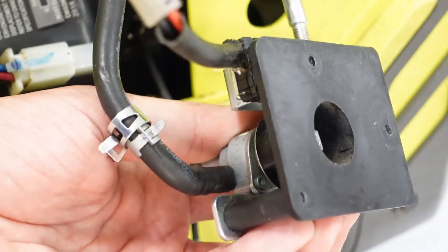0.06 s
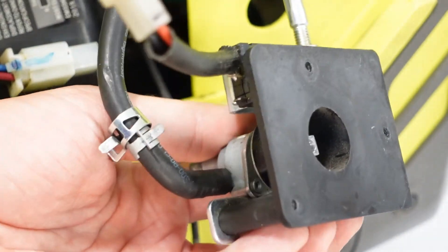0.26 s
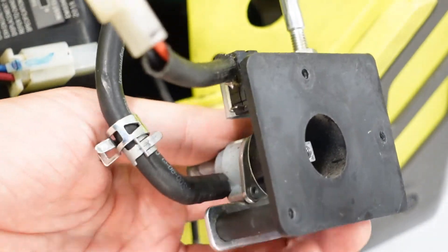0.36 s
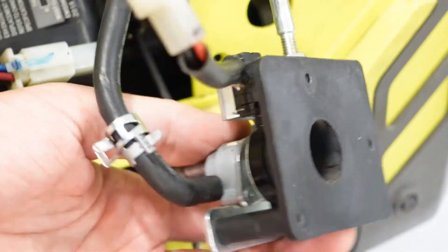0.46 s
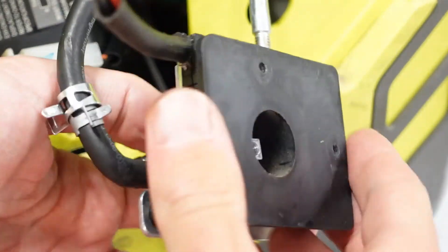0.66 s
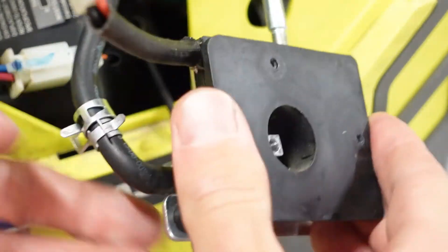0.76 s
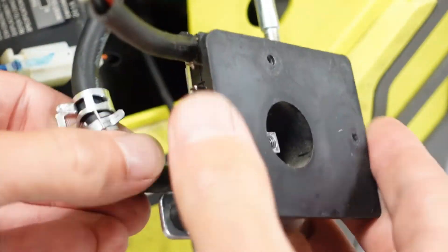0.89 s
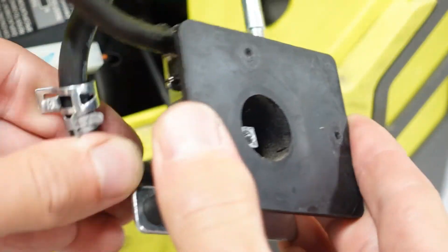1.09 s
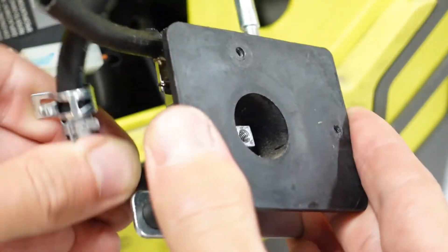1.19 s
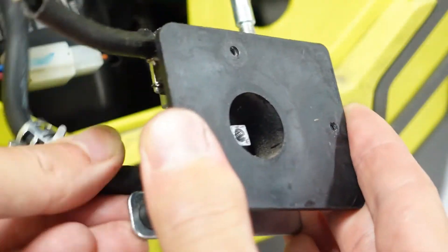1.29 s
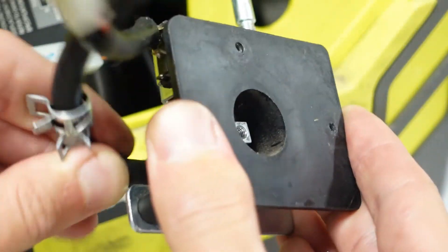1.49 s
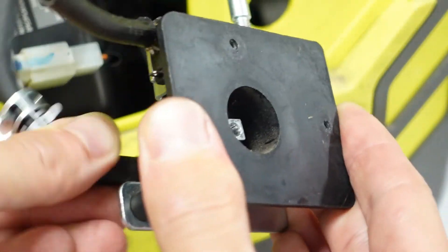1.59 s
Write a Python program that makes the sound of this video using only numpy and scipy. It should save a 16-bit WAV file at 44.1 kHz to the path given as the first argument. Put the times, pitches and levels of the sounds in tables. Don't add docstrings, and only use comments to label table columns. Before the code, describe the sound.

Pliers are put down on a hollow bench, close up. At about 0.2 seconds a soft, dull cluster of touches; at 0.33 a hard knock with rapid rebounds, a bright steel snap at 0.34, a short low boom and chattering rattle. Faint clicks follow near 0.55 and 0.85, then barely audible finger rubs and taps on plastic from 0.7 to 1.5, over quiet workshop hum.

```python
import sys
import numpy as np
from scipy import signal
from scipy.fft import rfft, irfft
from scipy.io import wavfile
from scipy.ndimage import uniform_filter1d

SR = 44100
rng = np.random.default_rng(int(sys.argv[2]) if len(sys.argv) > 2 else 0)


def convert_level_to_amplitude(level_db):
    exponent = np.asarray(level_db, float) / 20
    return 10 ** exponent


def generate_wav(sig):
    pcm = np.round(np.clip(np.atleast_2d(sig).T, -1, 1) * 32767).astype(np.int16)
    wavfile.write(sys.argv[1], SR, pcm)


N = 72765

# pitch in Hz, level in dB per Hz.
AIR_COLOUR = [(15, -38), (25, -6), (180, -3.5), (309, -10.5), (427, -9), (863, -14.5), (962, -14.5),
              (1160, -20), (16000, -27)]
# pitch in Hz, level in dB.
HUM_TONES = [(247.6, -84), (500.6, -79.5), (995.9, -86), (1254, -92.5), (2003, -95), (2498, -99.5),
             (2751, -95.5), (2998, -90)]
# start in seconds, level in dB, contact time in ms.
TOUCH_BLOWS = [
    (.2080, -24, 0.48),
    (.2123, -22.5, 0.33),
    (.2165, -18.5, 0.75),
    (.2212, -20, 3.05),
    (.2335, -34, 0.24),
    (.243, -41.5, 1.8),
    (.258, -40, 1.9),
    (.266, -39, 1.3),
]
# start in seconds, level in dB, contact time in ms.
KNOCK_BLOWS = [
    (.3256, -12.5, 0.12),
    (.3297, -16.5, 0.17),
    (.3327, -11.5, 0.27),
    (.3400, -16, 1.2),
    (.3455, -34, 0.63),
    (.354, -18.5, 1.12),
    (.362, -23, 1.5),
    (.371, -27, 1.32),
    (.380, -32.5, 1.34),
    (.389, -28, 1.78),
]
# pitch in Hz, level in dB, time to fall 60 dB in seconds.
TOUCH_TONES = [(143.3, -19, 0.062), (300, -13, 0.068), (360, 3, 0.071), (410, 7.5, 0.048),
               (560, 2.5, 0.076), (625, -3.5, 0.039), (980, -3, 0.02), (1150, -13.5, 0.017),
               (1707, -23.5, .03), (2020, -5, .06), (3200, -8.5, .04)]
# pitch in Hz, level in dB, time to fall 60 dB in seconds.
KNOCK_TONES = [(249, -23, 0.081), (300.3, -49, 0.0715), (394, -7, 0.024), (409, -2, 0.086),
               (495.7, -3, 0.028), (600, 2.5, 0.031), (695, 4.5, 0.021), (834, -11, 0.026),
               (1053, 1.5, 0.033), (1460, 1.5, 0.0068), (2238, -18, .01)]
# pitch in Hz, level in dB, time to fall 60 dB in seconds.
BOOM_TONES = [(136.7, -6.5, 0.53), (143, -7.5, .22), (161.5, 1, 0.19), (210, -12, .1), (92.3, -30.5, 0.18)]
# start in seconds, level in dB, rise in seconds, time to fall 60 dB in seconds, treble lift in dB.
CHATTER_BURSTS = [
    (0.21, -40.5, 0.0022, .5, -5),
    (0.3255, -38.5, 0.0017, 0.28, 3.5),
    (.341, -33, .003, 0.35, -5.5),
    (.532, -54, .003, .3, 0),
    (.565, -53.5, 0.0058, 0.27, 18),
    (0.795, -53.5, 0.0032, .15, 8),
    (0.961, -50, 0.0056, 0.054, 5),
]
# pitch in Hz, level in dB per Hz.
SCRAPE_COLOUR = [(1000, -14), (1700, -5.5), (2300, -10.5), (4700, -13), (10500, -11.5), (12500, -24),
                 (15500, -32.5)]
# pitch in Hz, time to fall 60 dB in seconds.
ROOM_DECAY = [(100, 0.2), (400, 0.33), (1500, 0.08), (5000, 0.58), (12000, 0.48)]
SNAP_TIMES = [
    .3257,
    .330,
    .3380,
    .33975,
    .34012,
    .34049,
    .534,
    .5762,
    .849,
]
SNAP_LEVELS = [-27.5, -31, -40, -8.5, -10.5, -20, -38, -41, -47]
SNAP_SHARES = [0.31, 0.15, 0.5, 0.93, 0.99, 1, .5, .15, .6]
# pitch in Hz, level in dB, time to fall 60 dB in seconds.
JAW_TONES = [(2970, -13, 0.0065), (5585, -6.5, 0.003), (7910, -11.5, 0.0017), (10550, -2.5, 0.0042),
             (11380, -5, .004), (15200, -27, .003)]
# start in seconds, length in seconds, level in dB, pitch in Hz, width in Hz.
FINGER_RUBS = [(0.718, 0.018, -64, 196, 100), (.858, 0.0068, -66.5, 451, 147.8),
               (.967, 0.0092, -59, 893, 329), (.970, 0.008, -61.5, 512, 251.5),
               (1.125, 0.0099, -69, 514, 97.7), (1.263, 0.041, -63.5, 495.5, 81.7),
               (1.427, 0.0097, -57, 866, 148), (1.433, 0.011, -54.5, 920, 146),
               (1.443, 0.021, -59, 907, 149), (1.425, 0.054, -62.5, 311, 60),
               (1.427, 0.12, -72.5, 1287, 70.8), (1.465, 0.036, -63.5, 600, 196)]
# top of the band in Hz, level that opens it fully in dB.
GATE_BANDS = [(400, -44), (1600, -44), (4000, -53), (9000, -54.5), (20000, -50)]

GATE_DEPTH_DB = 15


def evened(x):
    return x / np.sqrt(np.mean(x ** 2) + 1e-20)


def read(points, hz):
    f, value = np.transpose(points)
    return np.interp(np.log(hz + 1), np.log(f + 1), value)


def add(mix, s, sound):
    part = mix[round(s * SR):][:len(sound)]
    part += sound[:len(part)]


def resonate(x, hz, width):
    turn = np.exp(2j * np.pi * hz * np.arange(len(x)) / SR)
    r = np.exp(-np.pi * width / SR)
    return 2 * (turn * signal.lfilter([1 - r], [1, -r], x / turn)).real


def ring(tones, build_cycles):
    t = np.arange(SR // 2) / SR
    total = np.zeros(len(t))
    for hz, db, t60 in tones:
        decay = convert_level_to_amplitude(db - 60 * t / max(t60, .001))
        build = 1 - np.exp(-t * hz / (build_cycles * (hz < 450) + 0.019))
        total += decay * np.sin(2 * np.pi * hz * t) * build
    return total


def workshop():
    air_db, hum_width_hz = -67, 17
    frames, hz = N // 256 + 5, np.fft.rfftfreq(1024, 1 / SR)
    a, b, patches = rng.standard_normal((frames, 513, 3)).T
    patches = evened(uniform_filter1d(uniform_filter1d(patches, 8, 0), 6, 1))
    patch_db = read([(200, 1.5), (1200, 4.4), (3000, .6)], hz)[:, None]
    level = convert_level_to_amplitude(read(AIR_COLOUR, hz)[:, None] + patch_db * patches)
    air = signal.istft((a + 1j * b) * level, nperseg=1024, noverlap=768)[1][:N]
    noise = rng.standard_normal(N)
    hum = np.zeros(N)
    for f, db in HUM_TONES:
        tone = resonate(resonate(noise, f, hum_width_hz), f, hum_width_hz)
        hum += convert_level_to_amplitude(db) * evened(tone)
    return convert_level_to_amplitude(air_db) * evened(air) + hum


def bench(blows, tones):
    force = np.zeros(N)
    for s, db, ms in blows:
        u = np.arange(200) / SR * 1000 / max(ms, .05)
        push = np.sin(np.pi * np.minimum(u, 1)) ** 2
        add(force, s, convert_level_to_amplitude(db) * push / push.sum())
    return signal.fftconvolve(force, 0.35 * ring(tones, build_cycles=2.2))[:N]


def room(x):
    room_db, treble_db, gap_s = -8, -8.5, 0.002
    taps = np.zeros(SR // 2)
    at = np.arange(0, len(taps) - 12, 12)
    taps[at + rng.integers(0, 12, len(at))] = rng.choice([-1., 1.], len(at))
    hz, t, z = signal.stft(taps, SR, nperseg=256)
    tilt_db = treble_db * np.clip(np.log2(hz / 1000 + 1e-3) / 3, 0, 1)
    fade_db = tilt_db[:, None] - 60 * t / read(ROOM_DECAY, hz)[:, None]
    tail = signal.istft(z * convert_level_to_amplitude(fade_db), SR, nperseg=256)[1]
    tail = np.r_[np.zeros(round(gap_s * SR)), tail / np.linalg.norm(tail)]
    return convert_level_to_amplitude(room_db) * signal.fftconvolve(x, tail)[:N]


def chatter():
    grain_db = 1.5
    out, t, hz = np.zeros(N), np.arange(12000) / SR, np.fft.rfftfreq(12000, 1 / SR)
    grit = rng.standard_normal((len(CHATTER_BURSTS), 2, 12000))
    for (s, db, rise, t60, lift_db), (noise, lumps) in zip(CHATTER_BURSTS, grit):
        noise = noise * convert_level_to_amplitude(grain_db * evened(uniform_filter1d(lumps, size=60)))
        treble_db = lift_db * np.log2(hz / 8000 + 0.03) * (hz < 9000)
        low_cut = hz ** 2 / (hz ** 2 + 600 ** 2)
        colour = convert_level_to_amplitude(read(SCRAPE_COLOUR, hz) + treble_db) * low_cut
        envelope = np.minimum(t / rise, 1) * convert_level_to_amplitude(db - 60 * t / t60)
        add(out, s, evened(irfft(rfft(noise) * colour)) * envelope)
    return out


def jaws():
    tick, struck = np.zeros(N), np.zeros(N)
    grit = rng.standard_normal((len(SNAP_TIMES), 24))
    i = np.arange(24)
    for s, db, share, g in zip(SNAP_TIMES, SNAP_LEVELS, SNAP_SHARES, grit):
        burst = convert_level_to_amplitude(db) * ((i == 0) + 0.27 * g * np.exp(-i / 9))
        add(tick, s, burst)
        add(struck, s, share * burst)
    return signal.fftconvolve(struck, .5 * ring(JAW_TONES, build_cycles=0))[:N] + 0.97 * tick


def fingers():
    out = np.zeros(N)
    slips = rng.standard_normal((len(FINGER_RUBS), 4000))
    for (s, length, db, hz, width), slip in zip(FINGER_RUBS, slips):
        body = resonate(resonate(slip, hz, 2 * width), hz, width)[500:]
        press = np.sin(np.pi * np.minimum(np.arange(3500) / SR / length, 1) ** 0.93)
        rub = body * press
        add(out, s, convert_level_to_amplitude(db) * 2 * rub / abs(rub).max())
    return out


def scene():
    jaw_room_db, mic_low_hz = -11.5, 110
    quiet = workshop()
    wood = bench(TOUCH_BLOWS, TOUCH_TONES) + bench(KNOCK_BLOWS, KNOCK_TONES)
    wood += bench(KNOCK_BLOWS[:1], BOOM_TONES)
    steel = jaws()
    near = wood + steel + room(wood + convert_level_to_amplitude(jaw_room_db) * steel) + chatter()
    low_cut = signal.butter(3, mic_low_hz, "high", fs=SR, output="sos")
    near = signal.sosfilt(low_cut, near)
    return (near + convert_level_to_amplitude(GATE_DEPTH_DB) * (fingers() + quiet))[None]


def noise_gate(x):
    step_s, step_start_s = .0322, .016
    slope, link_db, ahead = 0.76, -28, 130
    hz = np.fft.rfftfreq(N, 1 / SR)
    spectrum = rfft(x) * (np.arange(N // 2 + 1) * SR / N > 18)
    out, below = np.zeros(N), 0
    step = (np.arange(N) / SR - step_start_s) // step_s * 1000
    for top_hz, open_db in GATE_BANDS:
        under = 1 / (1 + (hz / top_hz) ** 6)
        band = irfft(spectrum * (under - below), N)
        below = under
        power = signal.lfilter([.004], [1, -.996], band ** 2 + convert_level_to_amplitude(link_db) ** 2 * x ** 2)
        level_db = 10 * np.log10(np.roll(power, -ahead) + 1e-14) - GATE_DEPTH_DB
        gain_db = np.clip(slope * (level_db - open_db), -GATE_DEPTH_DB, 0)
        held_db = np.maximum.accumulate(gain_db + step) - step
        out += band * convert_level_to_amplitude(uniform_filter1d(held_db, size=66))
    return out


def top_cut(x):
    return signal.sosfilt(signal.butter(12, 16780, fs=SR, output="sos"), x)


def record(dry):
    gated = noise_gate(dry[0])
    treble_cut = signal.firwin(255, 16400, window=("kaiser", 8), fs=SR)
    mix = signal.oaconvolve(gated, treble_cut, "same")
    return top_cut(mix[None])


dry = scene()
out = record(dry)
generate_wav(out)
```